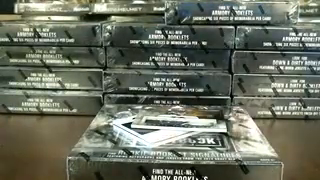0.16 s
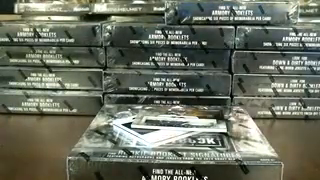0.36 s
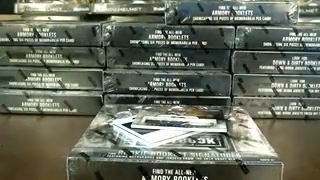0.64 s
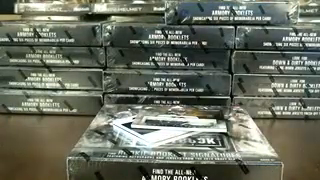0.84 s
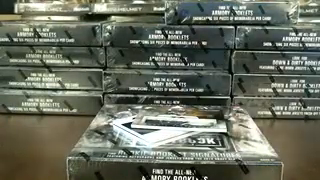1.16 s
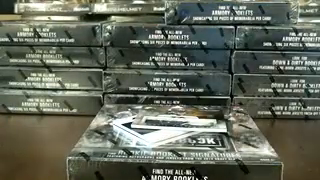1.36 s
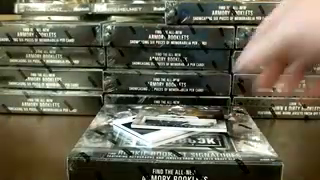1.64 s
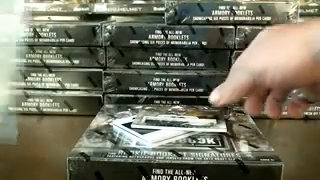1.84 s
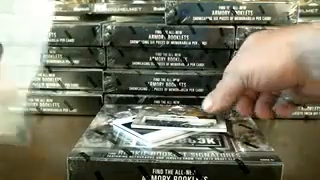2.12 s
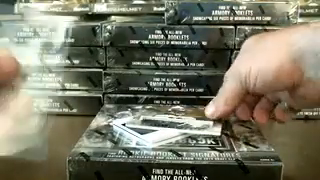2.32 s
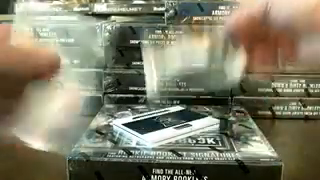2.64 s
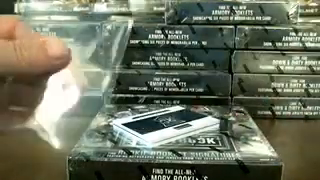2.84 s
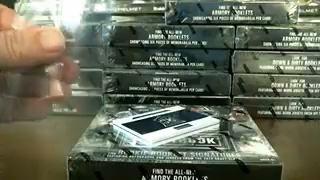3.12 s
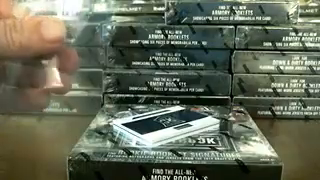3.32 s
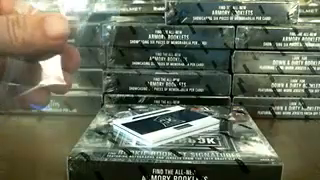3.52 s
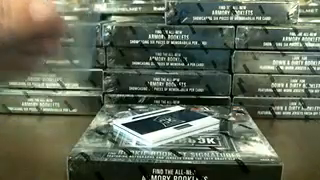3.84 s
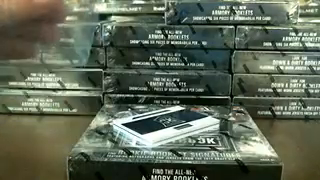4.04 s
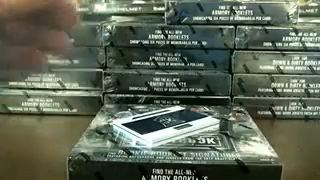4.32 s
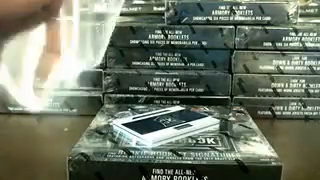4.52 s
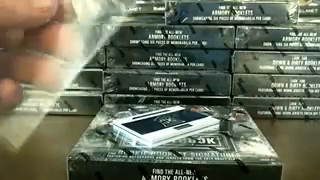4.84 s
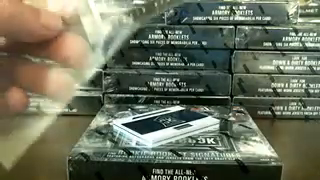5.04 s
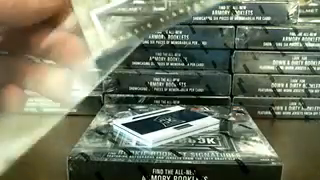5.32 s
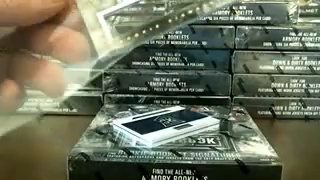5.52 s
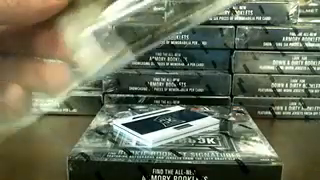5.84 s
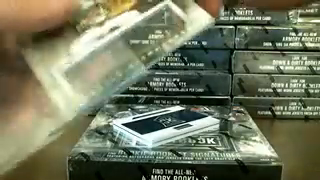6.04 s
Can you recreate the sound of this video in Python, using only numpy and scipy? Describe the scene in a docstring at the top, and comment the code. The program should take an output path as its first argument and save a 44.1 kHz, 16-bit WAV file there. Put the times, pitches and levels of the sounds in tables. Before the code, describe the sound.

Thin plastic sleeves crinkle and slide over trading cards close up, with sharp clicks and soft cardboard knocks in a quiet, faintly hissing room.

```python
"""Thin plastic sleeves slide over trading cards and rigid holders, heard close up at a desk in a small room.
Slides are grainy friction noise through a moving sheet resonance; snaps are sharp pulses spread into tiny chirps.
Holders knock on a cardboard box as short mode rings with a desk thud; edges scrape and hands brush as shaped noise.
Dense reflections follow the handling; soft low swells, faint tones and steady hiss lie underneath."""
import sys
import numpy as np
from scipy import signal
from scipy.fft import rfft, irfft, next_fast_len
from scipy.io import wavfile
from scipy.ndimage import uniform_filter1d

SR = 44100
rng = np.random.default_rng(int(sys.argv[2]) if len(sys.argv) > 2 else 0)


def generate_wav(signal):
    """Clip the signal to [-1, 1] and save it as 16-bit WAV at the path in sys.argv[1]."""
    frames = np.transpose(np.atleast_2d(signal))
    scaled = np.clip(frames, -1, 1) * 32767
    pcm = np.round(scaled).astype(np.int16)
    wavfile.write(sys.argv[1], SR, pcm)


N = 272119
TIME = np.arange(N) / SR

# strokes of plastic on plastic, level before judder and card ringing:
# [start t/s, attack t/s, hold t/s, release t/s, level/dB, flex resonance f/Hz, tilt above it/dB per octave]
STROKES = [(0, 0.004, 0.021, 0.045, -52.5, 537, -14.5), (0.051, 0.026, 0.038, 0.021, -51.5, 4800, -19.5),
           (0.213, 0.034, .012, 0.034, -41.5, 1940, -5.5), (0.253, 0.0094, .022, 0.023, -45.5, 2930, -14.5),
           (0.314, 0.021, 0.017, 0.019, -51, 3120, -28), (0.349, 0.012, 0.013, 0.044, -54.5, 1480, -8.5),
           (0.448, 0.0058, 0.012, 0.034, -56.5, 1670, -14.5), (0.551, .008, .008, 0.024, -50, 2050, -12.5),
           (0.566, 0.021, 0.11, 0.2, -40.5, 1480, -4), (0.616, 0.0048, 0.015, 0.056, -32.5, 1460, -1.5),
           (.695, 0.045, .03, 0.07, -33.5, 1610, -6.5), (0.826, 0.019, 0.017, 0.016, -47.5, 1582, -4.5),
           (0.961, 0.024, .02, 0.015, -47.5, 970, -5), (1.206, .012, 0.031, 0.038, -44.5, 1700, -12),
           (1.295, 0.096, 0.42, 0.12, -74, 1500, -3), (1.628, 0.0094, 0.01, 0.061, -57, 3840, -10.5),
           (1.691, 0.016, 0.012, 0.066, -61.5, 3640, 5.5), (2.319, 0.021, 0.12, 0.03, -63.5, 7200, -6.5),
           (2.463, 0.0072, 0.012, 0.027, -46.5, 760, -10), (2.542, 0.018, 0.08, 0.057, -50.5, 5140, -9),
           (2.984, 0.013, 0.017, 0.044, -43.5, 895, -3.5), (3.006, 0.0041, 0.011, 0.055, -37.5, 3300, -9.5),
           (3.108, 0.018, .008, 0.02, -60.5, 4400, -16.5), (3.74, 0.013, 0.032, 0.019, -60, 7050, -10),
           (4.11, 0.017, 0.014, 0.02, -48, 1760, -2.5), (4.14, .02, 0.051, .03, -60.5, 3020, -7),
           (4.201, 0.018, 0.051, 0.21, -43.5, 2970, -3), (4.271, 0.04, 0.029, 0.077, -42.5, 2960, -7.5),
           (4.406, 0.028, 0.0099, 0.016, -56, 1190, -1), (4.622, 0.016, 0.025, 0.033, -68, 7900, -5),
           (4.669, 0.047, 0.0057, 0.029, -52.5, 1440, -4.5), (4.725, 0.018, 0.03, 0.036, -42, 1970, -5.5),
           (4.87, .015, 0.014, 0.02, -50, 2000, 8), (4.89, .03, .025, 0.064, -51, 1070, -1),
           (5.005, 0.0078, 0.0044, 0.014, -54, 3980, -4.5), (5.058, 0.052, 0.038, 0.047, -48.5, 3660, 0.5),
           (5.219, 0.023, 0.0098, .04, -66, 7520, -12), (5.371, 0.028, 0.0041, 0.036, -54, 2600, -5.5),
           (5.559, 0.027, .005, 0.055, -53, 1820, -5), (5.651, 0.0082, 0.038, 0.063, -55.5, 2440, 2),
           (5.727, 0.066, 0.15, 0.11, -46, 4260, -6), (5.849, 0.047, .15, 0.0071, -42, 2660, 4),
           (6.14, 0.025, 0.0058, 0.037, -53, 8300, -18)]
# resonances and dips of the rigid holder: [f/Hz, width f/Hz, lift/dB]
HOLDER_RESONANCES = [(960, 160, 4), (1400, 220, -1.5), (2120, 400, 3), (3700, 700, 1.5), (5300, 1200, 1.5),
                     (7000, 2200, 3.5)]
# lightly damped bending modes of the sleeved card: [f/Hz, lift/dB]
CARD_MODES = [(1337, 7.5), (1426, 1), (1568, 2), (1846, 4.5), (2038, 2), (2286, -1.5), (2632, -2.5),
              (2746, 2), (3442, 2.5), (3790, 4), (4626, 5), (5357, 1.5), (6060, 3)]
# edges that catch and let go, level over 5 ms before card ringing:
# [t/s, level/dB, flex resonance f/Hz, tilt above it/dB per octave]
SNAPS = [(0.049, -48, 4400, -19), (0.069, -48, 4540, -39), (0.0895, -43.5, 4640, -27),
         (0.105, -39.5, 6360, -40), (0.172, -58.5, 2140, -15), (0.245, -40.5, 3830, -28),
         (0.2555, -34.5, 3350, -18), (0.327, -48, 3330, -28), (0.3593, -42, 1620, -4),
         (0.577, -28.5, 1790, -2), (0.5886, -28, 4700, -7), (0.6189, -24, 1610, 1), (0.626, -38, 2490, -1),
         (0.6441, -32, 1460, 5.5), (0.6708, -33, 2130, -5), (0.848, -44.5, 1970, -2), (0.91, -58, 1396, -2),
         (0.9692, -39.5, 3380, 0.5), (0.995, -38.5, 1210, -3.5), (1.2021, -50, 1920, -7),
         (1.22, -35, 1984, -11.5), (1.279, -46.5, 1810, -25), (1.808, -58, 2250, -10.5),
         (2.4674, -46, 600, -2), (2.588, -43, 4160, -5), (2.651, -41, 2430, -12), (3.0, -37.5, 1940, -10),
         (3.014, -19, 4260, 4.5), (3.124, -50, 4200, -11), (3.787, -54, 7970, 7), (4.4013, -41, 1750, -27),
         (4.428, -38, 1420, -5), (4.509, -56, 1920, -30), (4.6972, -47, 2060, -14.5),
         (4.7716, -26.5, 1790, 24), (4.787, -50, 2110, -24), (4.9123, -42.5, 3390, -19),
         (4.923, -42, 1250, -6.5), (4.9399, -35.5, 650, 1), (4.9443, -28.5, 1120, 1),
         (5.045, -59, 3280, -18), (5.1162, -42, 3660, 2), (5.132, -44.5, 3320, -10),
         (5.154, -47, 4300, -21), (5.428, -53.5, 7660, -18), (5.445, -55, 3540, -3),
         (5.5809, -33, 2140, -4.5), (5.8958, -18, 2790, -0.5), (6.003, -42.5, 2900, -13),
         (6.041, -36, 7700, -22), (6.072, -48, 5860, 7.5)]
# the holder's edge dragging, bell-shaped in time: [top t/s, half length t/s, level/dB, resonance f/Hz]
SCRAPES = [(0.26, 0.023, -61, 940), (0.333, 0.0079, -60.5, 540), (0.598, 0.02, -59, 615),
           (0.763, 0.031, -60, 670), (1.257, 0.023, -49.5, 401), (2.654, 0.0045, -49, 950),
           (4.695, 0.013, -54, 1022), (4.762, 0.014, -48.5, 930), (4.916, 0.011, -50, 1020),
           (5.591, 0.0059, -62.5, 950), (5.699, 0.014, -61.5, 2550)]
# holder and fingers bumping the box, level over 5 ms before the knock trim:
# [t/s, level/dB, knock centre f/Hz, number of rebounds]
KNOCKS = [(0.014, -40.5, 560, 0), (0.362, -47.5, 160, 0), (0.621, -46.5, 570, 1), (0.997, -40, 830, 0),
          (1.008, -44, 140, 1), (1.2205, -25.5, 800, 0), (1.336, -54, 98, 1), (1.403, -45.5, 250, 1),
          (1.749, -41.5, 415, 0), (2.368, -51, 130, 0), (2.467, -40, 645, 0), (2.48, -31.5, 326, 0),
          (2.499, -42.5, 530, 0), (2.513, -40, 335, 0), (2.581, -49.5, 167, 1), (2.6518, -48, 950, 1),
          (2.738, -46, 117, 0), (2.752, -46, 135, 1), (2.978, -48, 617, 0), (2.989, -39, 380, 0),
          (3.003, -32.5, 229.2, 0), (3.0075, -34, 420, 0), (3.0138, -33.5, 690, 0), (4.4029, -30.5, 394, 0),
          (4.772, -42, 316, 0), (4.786, -45, 910, 0), (4.922, -42, 940, 0), (4.9404, -41.5, 307, 0),
          (4.9447, -40, 990, 0), (5.961, -49.5, 244, 0), (6.001, -48.5, 389, 0)]
# modes of the box with the holder on it, before each bump's uneven strength: [f/Hz, level/dB, 60 dB decay t/s]
BOX_MODES = [(62.4, -12.5, 0.059), (105, 6, 0.045), (165, -7.5, 0.18), (225, 0.5, .05), (290, 0, 0.05),
             (412, 0, 0.021), (591, -9.5, 0.048), (797, 3, 0.023), (920, 3.5, 0.034), (1106, -8.5, 0.019),
             (1860, -4.5, 0.022)]
# hands and arms brushing the box, before the shuffle trim: [top t/s, half length t/s, level/dB]
BRUSHES = [(0.718, 0.15, -71.5), (1.261, 0.03, -49.5), (1.514, 0.012, -49), (1.597, 0.04, -52.5),
           (1.74, 0.04, -53.5), (2.173, 0.11, -63.5), (2.624, 0.053, -59), (3.273, .014, -58.5),
           (3.322, 0.011, -61), (3.72, .045, -65), (4.29, 0.055, -67), (4.428, 0.039, -60.5),
           (4.57, 0.05, -60), (4.782, .02, -57.5), (5.458, 0.055, -64.5), (5.88, 0.12, -66)]
# spectrum of the brushing, relative: [f/Hz, level/dB per Hz]
SHUFFLE_COLOUR = [(40, -25.5), (95, -7.5), (170, -11.5), (240, 2), (310, 6.5), (400, 0), (520, -12.5),
                  (900, -21.5), (3000, -52)]
# faint low tones that swell and fade: [top t/s, half length t/s, f/Hz, rms level at the top/dB]
SWELLS = [(3.581, 0.029, 463, -61), (3.615, .035, 155, -64.5), (3.683, 0.013, 488, -66.5)]
# spectrum of the room hiss, relative: [f/Hz, level/dB per Hz]
ROOM_COLOUR = [(25, -27.5), (60, -8.5), (105, -3), (200, 0), (300, -8), (450, -9), (560, -14.5),
               (1000, -13), (1700, -19), (4500, -27), (8800, -32.5), (12000, -47.5)]
# faint steady tones: [f/Hz, rms level/dB]
HUM = [(100, -82), (441, -83.5), (991, -87), (1141, -87.5)]

# the sleeve's resonance falls as its free length grows; the tilt lifts as the stroke gets weaker
RELEASE_DROP_DB, FLEX_GLIDE_OCTAVES_PER_S, TILT_PER_DB = 20, -2.7, -0.33
RINGING_FROM_TILT_DB, DAMPING_DB_PER_TILT_DB = -9, 0.45
CARD_MODE_WIDTH_HZ = 32
SCRAPE_Q = 2.3
REBOUND_S, REBOUND_LOSS_DB = 0.0091, 0.5
DESK_HZ, DESK_T60_S, DESK_DB, SOFT_CONTACT_HZ = 68, 0.044, -19, 260
RESTING_HANDS_DB = -78   # before the shuffle trim
ROOM_HISS_DB, ROOM_T60_S, ROOM_WET_DB = -69.5, 0.19, -16.5
TREBLE_EDGE_HZ, MIC_TOP_HZ = 10380, 12300


def sliding(patchy_db=2.5, judder_db=1.3, judder_hz=90):
    """Friction drives the sleeve, whose resonance moves as its free length changes."""
    control_t = TIME[::44]
    level_db, flex_hz, tilt_db = stroke_controls(control_t)
    level_db = np.interp(TIME, control_t, level_db)
    hz, t, spectra = signal.stft(friction(level_db), SR, nperseg=384, noverlap=288)
    hz = hz[:, None]
    moving_flex_hz = np.exp(np.interp(t, control_t, np.log(flex_hz)))
    gain = sheet_gain(hz, moving_flex_hz, np.interp(t, control_t, tilt_db), damping=1.0)
    gain = gain * (hz < TREBLE_EDGE_HZ * 1.2)
    # the shifting grip favours some bending modes for a moment, then others
    gain = gain * from_db(patchy_db * patches(gain.shape, frame_count=13, bin_count=5))
    # colour only: the stroke level is applied afterwards
    gain = gain / np.sqrt(np.mean(gain ** 2, axis=0))
    sound = signal.istft(spectra * gain, SR, nperseg=384, noverlap=288)[1][:N]
    return sound * from_db(level_db + judder_db * drift(judder_hz))


def stroke_controls(t):
    """Each stroke speeds up, holds and dies away; the strongest dominates resonance and brightness."""
    start, attack, hold, release, level_db, flex_hz, tilt_db = np.transpose(STROKES)[:, :, None]
    age = t - start
    fade = np.clip((age - attack - hold) / release, 0, 10)
    speed = np.clip(age / attack, 0, 1) * from_db(-RELEASE_DROP_DB * fade)
    power = (speed * from_db(level_db)) ** 2 + 1e-16
    total = power.sum(axis=0)
    share = power / total
    octaves = np.log2(flex_hz) + FLEX_GLIDE_OCTAVES_PER_S * np.clip(age, 0, attack + hold + release)
    tilt_db = tilt_db + TILT_PER_DB * 20 * np.log10(speed + 1e-2)
    return 10 * np.log10(total), 2 ** np.sum(share * octaves, axis=0), np.sum(share * tilt_db, axis=0)


def friction(level_db, crinkle_from_db=-34, crinkle_share=0.65):
    """Fine slips all the time; when pressed hard the film also buckles in sparse crinkles."""
    pressure = np.minimum(from_db((level_db - crinkle_from_db) / 2), 1)
    fine = microslips(per_s=4900, spread_db=4.5, smooth=0.82)
    crinkles = crinkle_share * pressure * microslips(per_s=260, spread_db=2.0, smooth=0.057)
    return (fine + crinkles) / np.sqrt(1 + (crinkle_share * pressure) ** 2)


def microslips(per_s, spread_db, smooth):
    """Friction force: countless tiny slips of uneven size over a smooth hiss."""
    sizes = from_db(spread_db * np.minimum(rng.exponential(1, N), 4)) * rng.choice([-1, 1], N)
    slips = rms_one(sizes * (rng.random(N) < per_s / SR))
    return rms_one(slips + smooth * rng.standard_normal(N))


def sheet_gain(hz, flex_hz, tilt_db, damping):
    """A sheet radiates little below its flex resonance; softer contact dulls the top and damps it less."""
    u = (hz / flex_hz) ** 2
    holder_db = sum(db / (1 + (2 * (hz - centre) / width) ** 2) for centre, width, db in HOLDER_RESONANCES)
    softness_db = np.minimum(tilt_db - RINGING_FROM_TILT_DB, 0)
    damping = damping * from_db(DAMPING_DB_PER_TILT_DB * softness_db)
    flex = u ** 2 / ((1 - u) ** 2 + damping * u)
    # far below the resonance the air simply slips round the sheet's edge
    leak = u / (u + 0.47)
    return flex * leak * from_db(tilt_db * np.log2(1 + u ** 2) / 4 + holder_db)


def patches(shape, frame_count, bin_count):
    """Random field, smooth over time and frequency, with spread 1."""
    field = uniform_filter1d(rng.standard_normal(shape), frame_count, axis=1)
    return rms_one(uniform_filter1d(field, bin_count, axis=0))


def card_ringing(x):
    """Whatever shakes the plastic also drives the card's bending modes, which lift or dip narrow bands."""
    r = np.exp(-np.pi * CARD_MODE_WIDTH_HZ / SR)
    out = x
    for hz, lift_db in CARD_MODES:
        band = np.array([1, 0, -1]) * (1 - r * r) / 2
        feedback = [1, -2 * r * np.cos(2 * np.pi * hz / SR), r * r]
        mode = signal.lfilter(band, feedback, x + 1e-18)
        out = out + (from_db(lift_db) - 1) * mode
    return out


def snapping(scatter=0.075, scatter_t60_s=0.02, ring_share=0.03, ring_t60_s=0.025,
             creep=0.03, creep_s=0.004, spread_s=0.0012):
    """The edge creeps, lets go sharply, then bending waves scatter and ring briefly in the sheet."""
    out, t = np.zeros(N), TIME[:2048]
    before = TIME[:512][::-1]
    hz = np.fft.rfftfreq(len(t), 1 / SR)
    reach = 1 / np.sqrt(1 + (hz / TREBLE_EDGE_HZ) ** 16)
    for s, level_db, flex_hz, tilt_db in SNAPS:
        force = scatter * rng.standard_normal(len(t)) * from_db(-60 * t / scatter_t60_s)
        force += ring_share * np.sin(2 * np.pi * flex_hz * t) * from_db(-60 * t / ring_t60_s)
        force[0] += 1   # the sharp release
        lead_in = creep * rng.standard_normal(len(before)) * np.exp(-before / creep_s)
        pulse = causal_pulse(sheet_gain(hz, flex_hz, tilt_db, damping=0.66) * reach)
        sound = signal.fftconvolve(np.r_[lead_in, force], dispersed(pulse, spread_s))
        add(out, s - before[0], sound, level_db)
    return out


def causal_pulse(gain):
    """The most compact one-sided pulse that has this spectrum (minimum phase)."""
    cepstrum = irfft(np.log(gain / gain.max() + 1e-4))
    half = len(cepstrum) // 2
    return irfft(np.exp(rfft(2 * cepstrum[:half], 2 * half)))


def dispersed(pulse, spread_s):
    """Bending waves travel faster at high pitch, so a snap is a tiny falling chirp; spread_s is the 1 kHz delay."""
    hz = np.fft.rfftfreq(len(pulse), 1 / SR)
    return irfft(rfft(pulse) * np.exp(-4j * np.pi * spread_s * np.sqrt(1000 * hz)))


def scraping():
    """Slips along the holder's edge excite one broad resonance at each drag."""
    force = microslips(per_s=1500, spread_db=7.0, smooth=0.44)
    out = np.zeros(N)
    for s, half, level_db, hz in SCRAPES:
        broad = signal.lfilter(*signal.iirpeak(hz, 1, fs=SR), force)
        drag = rms_one(signal.lfilter(*signal.iirpeak(hz, SCRAPE_Q, fs=SR), broad))
        out += drag * from_db(level_db) * np.exp(-((TIME - s) / half) ** 2 / 2)
    return out


def knocking(trim_db=-3.5, width=1.38, uneven_db=6.26):
    """Each bump rings the box and may rebound; its contact band and uneven mode strengths colour it."""
    out, t = np.zeros(N), TIME[:SR // 5]
    hz, mode_db, t60 = np.transpose(BOX_MODES)
    rings = np.cos(2 * np.pi * hz[:, None] * t) * from_db(-60 * t / t60[:, None])
    for s, level_db, centre_hz, rebounds in KNOCKS:
        contact = signal.butter(2, [centre_hz / width, centre_hz * width], "band", fs=SR, output="sos")
        for k in range(1 + round(rebounds)):
            strength = from_db(mode_db + uneven_db * rng.standard_normal(len(hz)))
            sound = signal.sosfilt(contact, strength @ rings)
            add(out, s + k * REBOUND_S, sound, level_db + trim_db - k * REBOUND_LOSS_DB)
    return out


def desk_thuds():
    """First impacts pass through the box into the desk; the softer the contact, the more of it is thud."""
    out, t = np.zeros(N), TIME[:SR // 4]
    thud = np.sin(2 * np.pi * DESK_HZ * t) * from_db(-60 * t / DESK_T60_S)
    for s, level_db, centre_hz, _ in KNOCKS:
        hardness_db = 20 * np.log10(1 + (centre_hz / SOFT_CONTACT_HZ) ** 2)
        add(out, s, thud, level_db + DESK_DB - hardness_db)
    return out


def shuffling(trim_db=-3.0, lumpy_db=3.5):
    """Skin and cardboard brush each other with a soft, lumpy rumble that swells and fades with each move."""
    power = from_db(RESTING_HANDS_DB) ** 2
    for s, half, level_db in BRUSHES:
        power = power + from_db(level_db) ** 2 * np.exp(-((TIME - s) / half) ** 2)
    return coloured_noise(SHUFFLE_COLOUR) * np.sqrt(power) * from_db(trim_db + lumpy_db * drift(26))


def room(x, build_s=0.0038, wall_hz=8000):
    """Dense reflections from desk, boxes and walls that swell quickly and die away."""
    t = TIME[:SR // 2]
    tail = rng.standard_normal(len(t)) * from_db(-60 * t / ROOM_T60_S) * (1 - np.exp(-t / build_s))
    tail = tail / np.sqrt(np.sum(tail ** 2))
    tail = signal.sosfilt(signal.butter(1, wall_hz, fs=SR, output="sos"), tail)
    return signal.fftconvolve(x, tail)[:N]


def swells():
    """Soft low tones with wandering phase rise out of the background and sink back."""
    out = np.zeros(N)
    for s, half, hz, level_db in SWELLS:
        tone = np.sqrt(2) * np.sin(2 * np.pi * hz * TIME + 0.89 * drift(11))
        out += from_db(level_db) * tone * np.exp(-((TIME - s) / half) ** 2 / 2)
    return out


def background():
    """Room hiss with a few faint tones, steady in level and slightly wandering in phase."""
    out = from_db(ROOM_HISS_DB) * coloured_noise(ROOM_COLOUR)
    for hz, level_db in HUM:
        out += np.sqrt(2) * from_db(level_db) * np.sin(2 * np.pi * hz * TIME + 1.8 * drift(2.4))
    return out


def coloured_noise(points):
    """Steady noise with the given spectrum, rms 1."""
    hz, db = np.transpose(points)
    size = next_fast_len(N)
    bins = np.maximum(np.fft.rfftfreq(size, 1 / SR), 1)
    gain = from_db(np.interp(np.log(bins), np.log(hz), db))
    return rms_one(irfft(rfft(rng.standard_normal(size)) * gain, size)[:N])


def drift(rate_hz):
    """Smooth random wandering with spread 1, drawn at every 20th sample."""
    r = np.exp(-40 * np.pi * rate_hz / SR)
    # the first 2000 values let the filter settle
    slow = signal.lfilter([1], [1, -2 * r, r * r], rng.standard_normal(N // 20 + 2002))[2000:]
    return np.interp(np.arange(N) / 20, np.arange(len(slow)), rms_one(slow))


def from_db(db):
    """Decibels to gain."""
    return 10 ** (np.asarray(db) / 20)


def rms_one(x):
    """Scale to unit rms."""
    return x / np.sqrt(np.mean(x ** 2) + 1e-20)


def add(track, s, sound, level_db):
    """Mix in a short sound at time s, its energy counted over 5 ms."""
    start = max(round(s * SR), 0)
    sound = sound / np.sqrt(np.sum(sound ** 2) / (0.005 * SR))
    track[start:start + len(sound)] += from_db(level_db) * sound[:N - start]


def scene():
    """Close handling sounds, their reflections and the quiet room."""
    slides = card_ringing(sliding()) + scraping()
    snaps = card_ringing(snapping())
    knocks = knocking() + desk_thuds()
    # the box radiates all round, so more of it reaches the walls
    to_walls = snaps + from_db(4.0) * knocks + from_db(-10.5) * slides
    reflections = from_db(ROOM_WET_DB) * room(to_walls)
    mix = slides + snaps + knocks + reflections + shuffling() + swells() + background()
    return mix[None, :]


def record(dry, leak_db=-20):
    """The treble drops to a low shelf above its edge, then the top is cut."""
    passed = signal.sosfilt(signal.ellip(8, 0.3, 60, TREBLE_EDGE_HZ, fs=SR, output="sos"), dry)
    shelved = passed + from_db(leak_db) * dry
    return signal.sosfilt(signal.ellip(10, 0.2, 80, MIC_TOP_HZ, fs=SR, output="sos"), shelved)


dry = scene()
out = record(dry)
generate_wav(out)
```